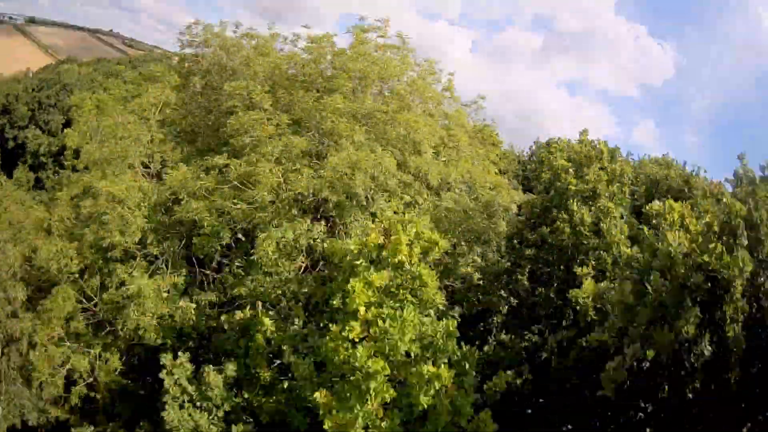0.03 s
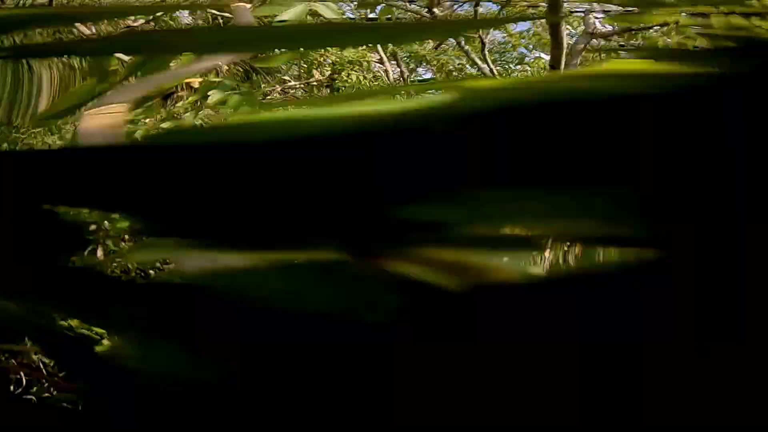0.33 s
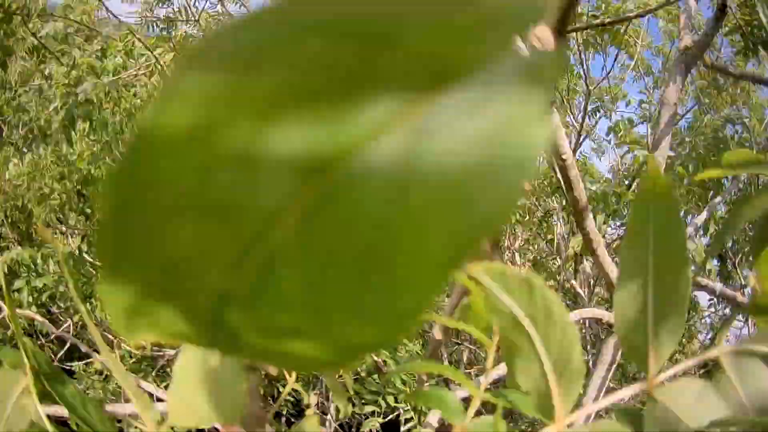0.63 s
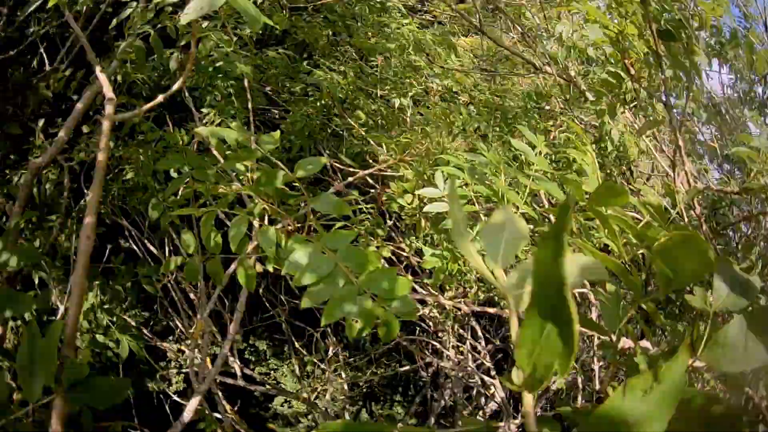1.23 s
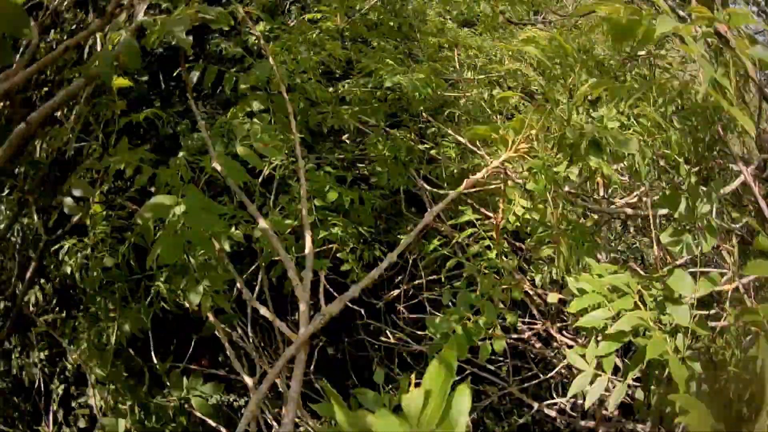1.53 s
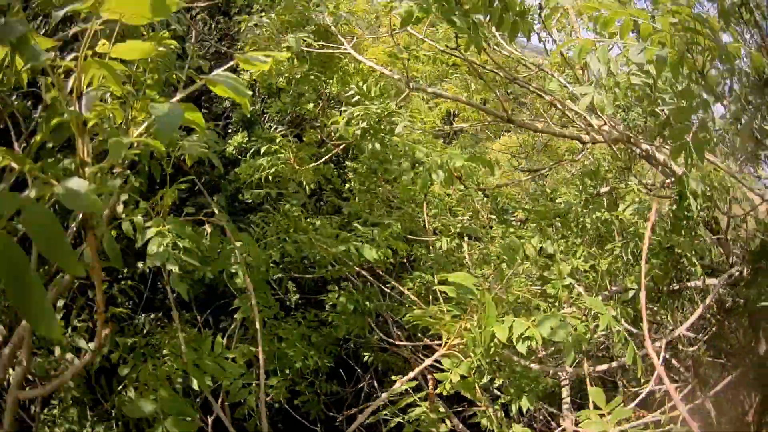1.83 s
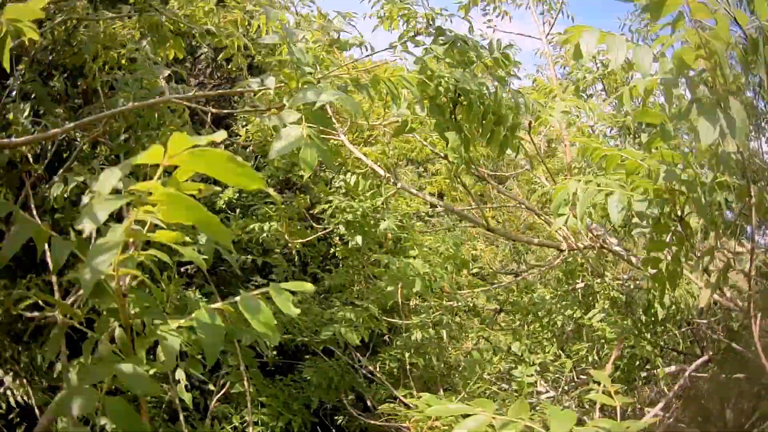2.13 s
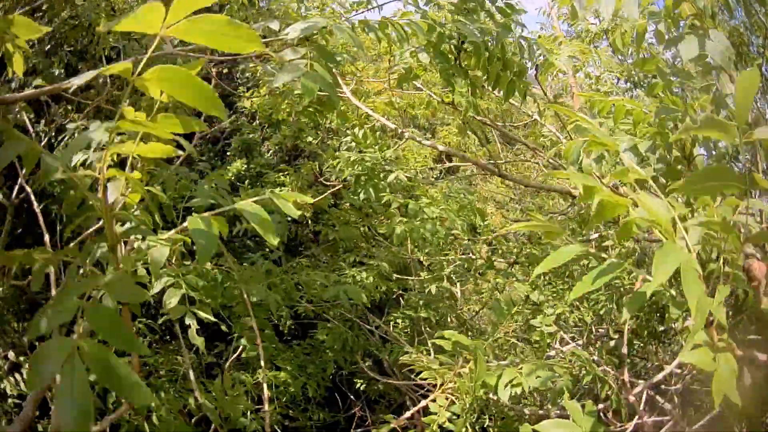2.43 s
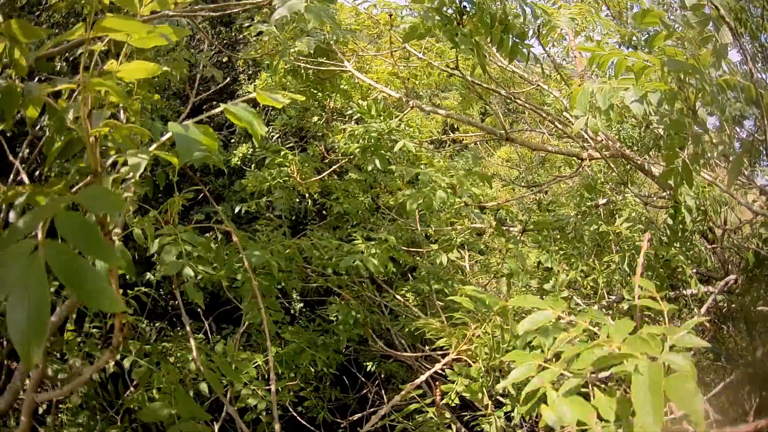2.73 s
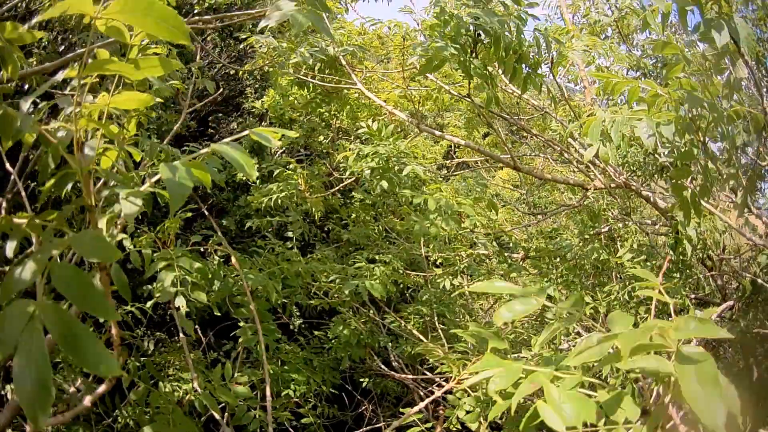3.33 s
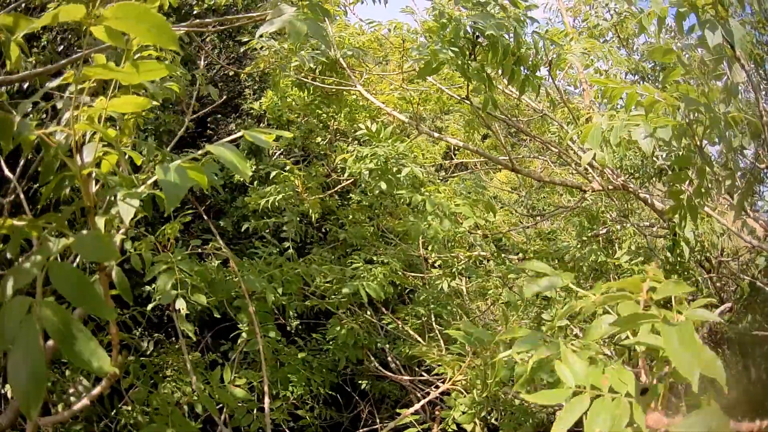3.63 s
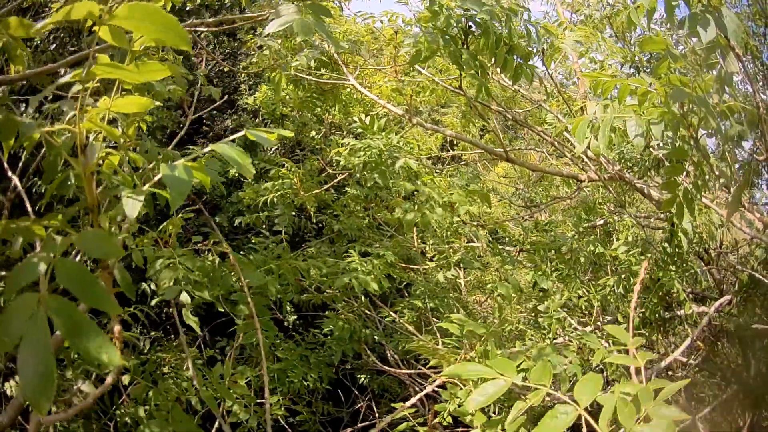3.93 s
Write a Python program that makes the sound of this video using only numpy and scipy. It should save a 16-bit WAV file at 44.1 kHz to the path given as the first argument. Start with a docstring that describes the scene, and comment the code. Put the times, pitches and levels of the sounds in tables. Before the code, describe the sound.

Leaves thrash loudly from the start as a model aircraft ploughs into a treetop, overloading its onboard microphone. From about 0.5 seconds the jammed motor squeals harshly, wavering and catching, then cuts out near 1.3 seconds. The hollow body scrapes and groans along branches until 1.7 seconds. Shaken foliage then rustles faintly and dies away, with scattered dry twig cracks and a soft leafy brush around 3.5 seconds.

```python
"""Loud thrashing leaves, a harsh squeal, a scrape, then a fading rustle with small cracks.
A small model aircraft ploughs into a treetop, heard from its own overloaded camera.
Leaves beat on its body; the jammed motor squeals, wavering and locking, then cuts out.
The wreck slides to a stop, groaning on a branch; twigs tick against it and the foliage settles."""
import sys
import numpy as np
from scipy import signal
from scipy.fft import rfft, irfft
from scipy.io import wavfile
from scipy.ndimage import uniform_filter1d

SR = 44100
rng = np.random.default_rng(int(sys.argv[2]) if len(sys.argv) > 2 else 0)


def put_to_file(sound):
    """Save the sound as 16-bit audio at rate SR, in the file named by the first command-line argument."""
    columns = np.atleast_2d(sound).T  # one column per channel
    safe = np.clip(columns, -1, 1)
    whole_steps = np.round(safe * 32767)
    wavfile.write(sys.argv[1], SR, whole_steps.astype(np.int16))


N = 176400  # 4 seconds


def amp(db):
    """Turns decibels into a factor to multiply by."""
    return 10 ** (np.asarray(db) / 20)


def unit(x):
    """Scales a signal to an average strength (rms) of 1."""
    return x / np.sqrt(np.mean(x ** 2) + 1e-20)


def colour(x, points, extra_db=0):
    """Turns lows and highs up or down along a curve of (Hz, dB) points."""
    hz, db = np.transpose(points)
    all_hz = np.fft.rfftfreq(len(x), 1 / SR)
    gain_db = np.interp(np.log(all_hz + 1), np.log(hz + 1), db)
    return irfft(rfft(x) * amp(gain_db + extra_db), len(x))


def level(points):
    """Volume along (seconds, dB) points; silent outside them, unless they reach the scene's edge."""
    times, db = np.transpose(points)
    before_db = db[0] if times[0] < .1 else -120
    after_db = db[-1] if times[-1] > 3.9 else -120
    return amp(np.interp(np.arange(N) / SR, times, db, left=before_db, right=after_db))


def wander(rate_hz):
    """A smooth random wobble, up to about the given rate."""
    hz = np.fft.rfftfreq(N, 1 / SR)
    return unit(irfft(rfft(rng.standard_normal(N)) / (1 + (hz / rate_hz) ** 4), N))


def add(mix, start, sound):
    """Mixes a sound in at a start time in seconds."""
    part = mix[round(start * SR):][:len(sound)]
    part += sound[:len(part)]


def tone(hz):
    """A pure tone that follows a pitch curve."""
    return np.sqrt(2) * np.sin(2 * np.pi * np.cumsum(hz) / SR)


def rough_tone(hz, jitter, patch_db, rate_hz):
    """A tone whose pitch trembles and whose loudness comes in patches."""
    trembling = tone(hz * (1 + jitter * wander(3 * rate_hz)))
    patches = amp(patch_db * np.clip(wander(rate_hz), -2, 2))
    return trembling * unit(patches)


def leaves(per_second, rub, clump_db, clump_hz):
    """Single leaves slap in clumps over the hiss of their rubbing."""
    clicks = (rng.random(N) < per_second / SR) * rng.choice([-1., 1.], N)
    strength_db = 3 * np.minimum(rng.exponential(1, N), 4)
    slaps = unit(clicks * amp(strength_db))
    hiss = rub * rng.standard_normal(N)
    return (slaps + hiss) * amp(clump_db * wander(clump_hz))


def body_ring_db(share):
    """The aircraft's hollow body strengthens some frequencies and weakens others."""
    # Each row: frequency in Hz, width in Hz, boost or cut in dB at a share of 1.
    resonances = [(450, 90, 7), (760, 330, 6), (2030, 140, -10.5), (3720, 160, 2), (5800, 300, 3)]
    hz = np.fft.rfftfreq(N, 1 / SR)
    return share * sum(db / (1 + (2 * (hz - centre) / width) ** 2) for centre, width, db in resonances)


def thrash():
    """Propeller and wings tear through the leaves."""
    # The surges of thrashing. Each row: time in seconds, level in dB.
    loudness = [(0, 9.5), (.1, -8.5), (.2, -6.5), (.3, -1), (.42, -2), (.52, -12.5), (.65, -12),
                (.85, -8.5), (1.03, -8), (1.16, -9.5), (1.21, -20), (1.255, -24.5), (1.28, -23)]
    # Its tone colour. Each row: frequency in Hz, gain in dB.
    tone_colour = [(60, -27.5), (350, -30.5), (600, -9.5), (800, -6.5), (1250, -2.5), (2000, 1), (2900, -4),
                   (3800, -5), (4500, -10.5), (6200, -8), (8000, -22.5), (11000, -18), (16000, -17.5)]
    hits = leaves(per_second=2500, rub=0.95, clump_db=3.0, clump_hz=69)
    return level(loudness) * unit(colour(hits, tone_colour, body_ring_db(share=0.26)))


def hiss_and_whistle():
    """The woods hiss faintly throughout, and the recorder adds a thin electronic whistle."""
    # The colour of the hiss. Each row: frequency in Hz, gain in dB.
    tone_colour = [(30, -7.5), (200, -17.5), (580, -17), (950, -4), (2200, 0), (3600, -3), (4600, -6),
                   (6300, -8.5), (7200, -11.5), (8100, -27), (11000, -8.5), (13500, -23), (16000, -16.5)]
    whistle = rough_tone(hz=15650, jitter=.006, patch_db=2.5, rate_hz=60)
    hiss = unit(colour(rng.standard_normal(N), tone_colour))
    return amp(-57) * hiss + amp(-80) * whistle


def tear():
    """Leaves rip right at the microphone with a bright hiss."""
    # Two quick swells. Each row: time in seconds, level in dB.
    loudness = [(.14, -62), (.17, -14), (.23, -12), (.28, -34), (.36, -18), (.46, -52)]
    # Mostly treble. Each row: frequency in Hz, gain in dB.
    tone_colour = [(60, -38), (2000, -20), (5000, -3), (8000, 2), (12000, 22), (16000, -3.5)]
    return level(loudness) * unit(colour(rng.standard_normal(N), tone_colour))


def motor():
    """The jammed motor wavers and rasps, and drops to a nearly steady note whenever it locks."""
    # The squeal. Each row: time in seconds, unlocked pitch in Hz, base level in dB.
    squeal = [(.44, 2085, -29), (.49, 2000, -22.5), (.51, 2149, -2.5), (.517, 2678, -5.5),
              (0.529, 2596, -2), (.549, 2454, -8), (.56, 2089, -15.5), (0.589, 1983, -5),
              (.625, 1955, -9.5), (.66, 1919, -8), (.75, 1903, -10.5), (.82, 1909, -9.5), (.9, 1911, -9),
              (.99, 1860, -6), (1.07, 1967, -7.5), (1.105, 1979, -4.5), (1.125, 1983, -14.5),
              (1.15, 2009, -19.5), (1.168, 1972, 1), (1.186, 1735, -9.5), (1.26, 1801, -8),
              (1.272, 1797, -41)]
    # The moments the rotor locks. Each row: start in seconds, length in seconds.
    locks = [(0.522, .021), (0.563, .009), (0.593, .016), (0.641, .007), (0.674, .007), (0.708, .009),
             (1.057, .005), (1.079, .007), (1.098, .017), (1.126, .016), (1.189, .085)]
    # Rough side tones. Each row: multiple of the pitch, level in dB relative to the squeal.
    rasps = [(.5, -12), (1.399, -14.5), (1.92, -10.5)]
    lock_hz, lock_boost_db, glide_seconds, flutter_hz = 1615.4, 3, .003, 31
    t = np.arange(N) / SR
    times, hz, db = np.transpose(squeal)
    locked = sum(1. * ((t > start) & (t < start + length)) for start, length in locks)
    locked = uniform_filter1d(np.minimum(locked, 1), round(glide_seconds * SR))  # 0 free, 1 locked
    waver = wander(rate_hz=130)
    flutter = np.sin(2 * np.pi * flutter_hz * t + wander(flutter_hz / 2))
    free_pitch = np.interp(t, times, hz) * (1 + .026 * waver + .035 * flutter)
    locked_pitch = lock_hz * (1 + .005 * waver)
    pitch = (1 - locked) * free_pitch + locked * locked_pitch
    note = amp(lock_boost_db * locked) * tone(pitch)
    rasp = sum(amp(rasp_db) * rough_tone(multiple * pitch, jitter=.07, patch_db=8, rate_hz=111.3)
               for multiple, rasp_db in rasps)
    return level(np.transpose([times, db])) * (note + (1 - locked) * rasp)


def shrieks():
    """The squeal leaps up for an instant."""
    # Each row: start in seconds, length in seconds, top pitch in Hz, level in dB.
    leaps = [(0.603, 0.016, 2747, -9.5), (1.123, 0.01, 2915, -11), (1.139, 0.0128, 3515, -8.5),
             (1.15, .009, 2535, -8), (1.1985, 0.0034, 2986, -5.5)]
    out = np.zeros(N)
    for start, length, hz, db in leaps:
        arch = np.sin(np.pi * np.arange(0, 1, 1 / (length * SR)))
        add(out, start, amp(db) * arch * tone(hz * (.9 + .1 * arch)))
    return out


def slide():
    """Branches scrape the hollow body as it slides down, and make it ring."""
    # The scrape. Each row: time in seconds, level in dB.
    loudness = [(1.255, -24), (1.27, -9.5), (1.298, -12), (1.308, -20), (1.32, -14.5), (1.45, -13.5),
                (1.55, -16.5), (1.655, -16), (1.668, -15), (1.7, -19.5), (1.715, -29), (1.74, -42),
                (1.8, -45)]
    # Its tone colour. Each row: frequency in Hz, gain in dB.
    tone_colour = [(60, -51), (330, -36.5), (450, -12.5), (600, -11), (1050, -6.5), (1400, -6.5), (2050, 3),
                   (2700, -5), (3700, -5), (4500, -12.5), (6200, -11), (8000, -32), (11000, -19.5),
                   (16000, -31.5)]
    hits = leaves(per_second=1700, rub=1.0, clump_db=1.5, clump_hz=90)
    return level(loudness) * unit(colour(hits, tone_colour, body_ring_db(share=0.58)))


def groan():
    """The body sticks and slips on a branch, which sets off a few wavering tones in it."""
    # The drag over the branch. Each row: time in seconds, pitch in Hz, base level in dB.
    drag = [(1.261, 697, -33), (1.276, 688, -16.5), (1.297, 679.6, -22), (1.309, 718.3, -32),
            (1.34, 734, -23.5), (1.387, 702, -26), (1.451, 754.7, -26.5), (1.519, 748.5, -27),
            (1.62, 707, -27.5), (1.67, 719.6, -35), (1.7, 710, -57)]
    # The body's tones. Each row: multiple of the pitch, relative level in dB.
    body_tones = [(.575, -8.5), (0.999, 0.5), (1.13, -3), (1.55, -4.5), (2.819, -3.5)]
    times, hz, db = np.transpose(drag)
    pitch = np.interp(np.arange(N) / SR, times, hz)
    ring = sum(amp(tone_db) * rough_tone(multiple * pitch, jitter=.022, patch_db=3, rate_hz=38.75)
               for multiple, tone_db in body_tones)
    return level(np.transpose([times, db])) * ring


def settling():
    """Shaken foliage rustles and dies away."""
    # The uneven fade. Each row: time in seconds, level in dB.
    loudness = [(1.69, -51), (1.72, -36), (1.8, -37.5), (1.86, -41), (1.96, -41.5), (2.04, -47),
                (2.07, -43.5), (2.13, -46), (2.16, -50.5), (2.23, -48), (2.32, -50), (2.41, -53),
                (2.425, -48.5), (2.5, -48), (2.6, -50.5), (2.74, -59.5), (2.82, -53.5), (3, -55),
                (3.2, -59), (3.4, -54), (3.55, -64), (3.75, -59), (4, -60)]
    # The rustle's colour. Each row: frequency in Hz, gain in dB.
    tone_colour = [(60, -21), (250, -29.5), (500, -16), (800, -10.5), (1300, -8.5), (2000, -2.5),
                   (3300, -3.5), (4600, -10.5), (6200, -3), (7200, -15.5), (8200, -38), (11000, -9.5),
                   (13500, -28), (16000, -15)]
    rustle = leaves(per_second=900, rub=1.5, clump_db=2.5, clump_hz=40)
    return level(loudness) * unit(colour(rustle, tone_colour))


def twigs():
    """Each twig strikes the wreck with a dry crack, a short, faint tail and little bass."""
    # Each row: start in seconds, level in dB before colouring, centre in Hz, spread in octaves,
    # seconds for the crack to fade by 60 dB.
    strikes = [(1.788, -25, 6100, 0.33, 0.014), (1.871, -35.5, 630, 1.2, 0.089),
               (1.877, -28, 1500, 1.1, 0.022), (1.914, -27, 3040, 1.23, 0.083),
               (1.9197, -10.5, 1030, 1.23, 0.0099), (1.925, -29, 910, 0.99, 0.041),
               (1.932, -21.5, 2800, 1.15, 0.02), (1.976, -34, 1820, 1.2, 0.071),
               (2.188, -25, 3800, .55, 0.011), (2.219, -45, 960, 1.1, 0.067),
               (2.304, -37.5, 2820, 0.63, 0.018), (2.451, -38, 2820, .7, 0.036),
               (2.520, -32, 2500, 0.43, 0.02), (2.577, -26, 2400, 0.82, 0.013),
               (2.645, -44.5, 3200, 1, .03), (2.676, -43.5, 3170, 0.77, 0.055),
               (2.790, -30, 2300, 0.64, 0.011), (3.055, -44.5, 2600, 0.52, 0.029),
               (3.223, -41, 3200, .9, 0.028), (3.236, -45, 3200, .9, 0.056),
               (3.359, -36.5, 1570, 0.77, 0.08)]
    # The colour all cracks share. Each row: frequency in Hz, gain in dB.
    tone_colour = [(60, -28), (200, -22.5), (350, -8.5), (650, 3.5), (2000, 0), (3600, 3), (6200, -3.5),
                   (7200, 0.5), (8100, -20), (11000, 2), (13500, -14), (16000, -11)]
    rise_seconds, tail_seconds, tail_db = .001, .16, -29.5
    out, t = np.zeros(N), np.arange(8192) / SR
    hz = np.fft.rfftfreq(len(t), 1 / SR)
    for start, db, centre_hz, octaves, fade_seconds in strikes:
        band_db = -10 * np.log10(1 + (np.log2((hz + 1) / centre_hz) / octaves) ** 6)
        noise = irfft(rfft(rng.standard_normal(len(t))) * amp(band_db))
        fade = amp(-60 * t / fade_seconds) + amp(tail_db - 60 * t / tail_seconds)
        shape = np.minimum(t / rise_seconds, 1) * fade
        strength = amp(db) * np.sqrt(np.mean(shape ** 2))
        add(out, start, strength * unit(shape * noise))
    return colour(out, tone_colour)


def brush():
    """Leafy branches brush along the wing, each stroke swelling and fading."""
    # Each row: start in seconds, length in seconds, level in dB, added brightness in dB per octave.
    strokes = [(2.41, 0.046, -41, 9), (3.424, 0.11, -34, 0)]
    # The colour the strokes share. Each row: frequency in Hz, gain in dB.
    tone_colour = [(60, -36), (300, -34), (500, -24), (1000, -18), (1500, -11), (2400, -2.5), (3300, 0),
                   (4600, -7.5), (6200, -5), (8000, -31), (11000, -26), (16000, -35)]
    out, hz = np.zeros(N), np.fft.rfftfreq(N, 1 / SR)
    for start, length, db, brightness in strokes:
        progress = np.clip((np.arange(N) / SR - start) / length, 0, 1)
        swell = abs(np.sin(np.pi * progress ** .8)) ** 1.43  # peaks a little before halfway
        rubbing = leaves(per_second=3400, rub=1.0, clump_db=3.0, clump_hz=120)
        out += amp(db) * swell * unit(colour(rubbing, tone_colour, brightness * np.log2(hz + 1)))
    return out


def scene():
    """Adds up the crash and the quiet after it, the same in both channels."""
    crash = thrash() + tear() + slide() + groan() + motor() + shrieks()
    aftermath = twigs() + settling() + brush()
    mono = crash + aftermath + hiss_and_whistle()
    return np.array([mono, mono])


def record(dry):
    """The single microphone overloads hard and a little lopsidedly; the recorder dulls the treble."""
    # The recorder's tone colour. Each row: frequency in Hz, gain in dB.
    tone_colour = [(20, -2.5), (3000, -1), (6300, -5), (8000, -7.5), (10000, -15.5), (12000, -18.5),
                   (14000, -16.5), (15500, -7.5)]
    ceiling, lopsidedness, lowest_hz, highest_hz = amp(-11.5), .05, 20, 15900
    # Flattening the peaks at four times the sample rate keeps false tones down.
    driven = signal.resample_poly(dry[0], 4, 1) / ceiling + lopsidedness
    flattened = driven / (1 + driven ** 8) ** (1 / 8) - lopsidedness
    overloaded = ceiling * signal.resample_poly(flattened, 1, 4)
    padded = np.concatenate([overloaded, np.zeros(SR)])
    coloured = colour(padded, tone_colour)[:N]
    treble_cut = signal.firwin(511, highest_hz, window=("kaiser", 9), fs=SR)
    rumble_cut = signal.butter(1, lowest_hz, "high", fs=SR, output="sos")
    out = signal.sosfilt(rumble_cut, signal.oaconvolve(coloured, treble_cut, "same"))
    return np.array([out, out])


dry = scene()
out = record(dry)
put_to_file(out)
```